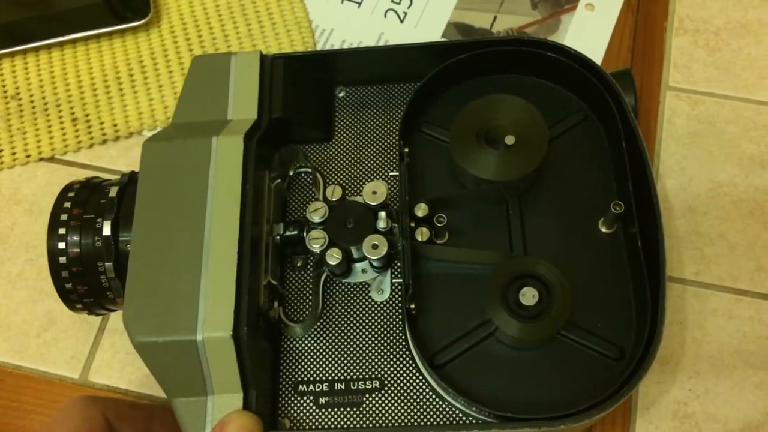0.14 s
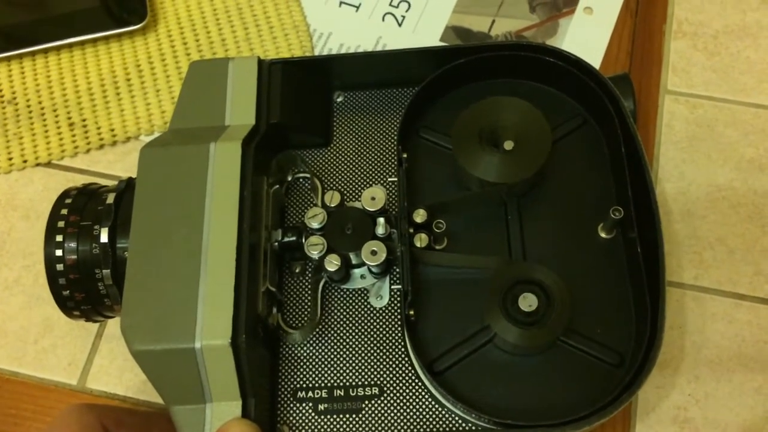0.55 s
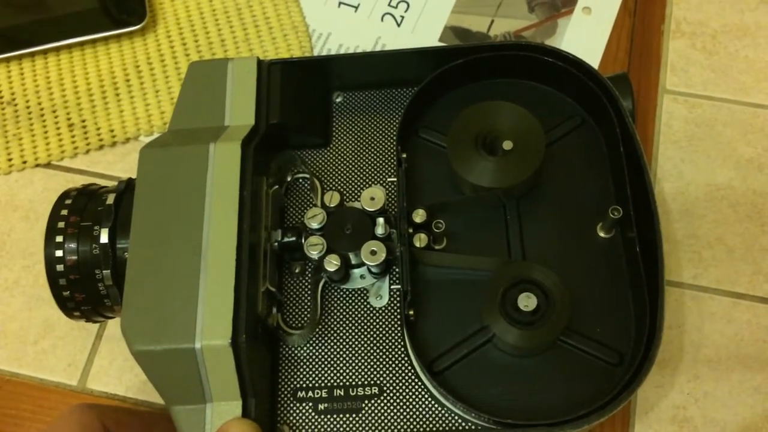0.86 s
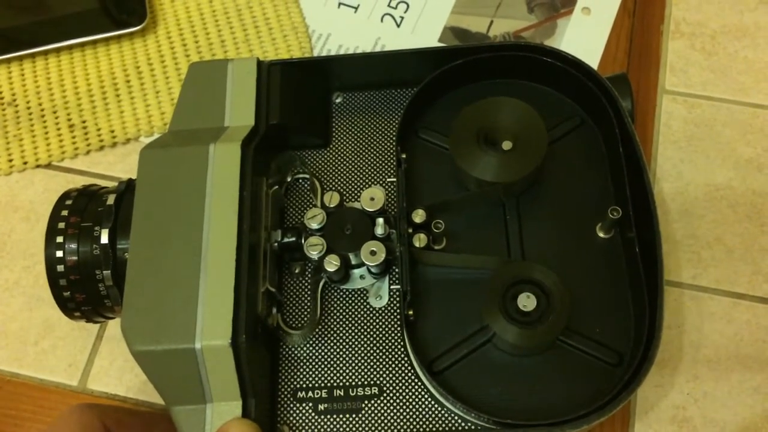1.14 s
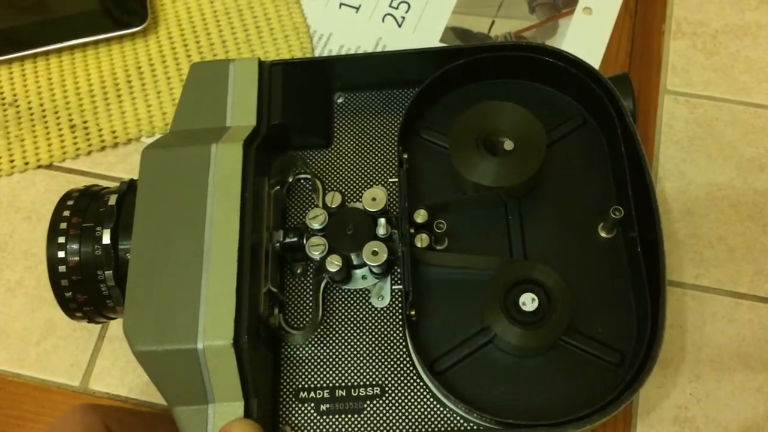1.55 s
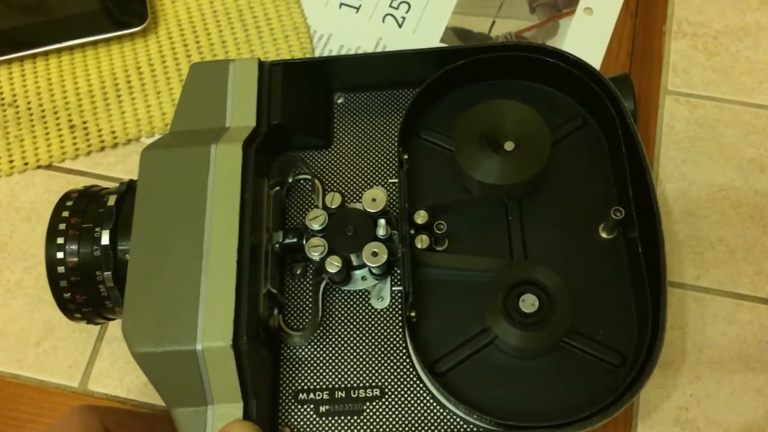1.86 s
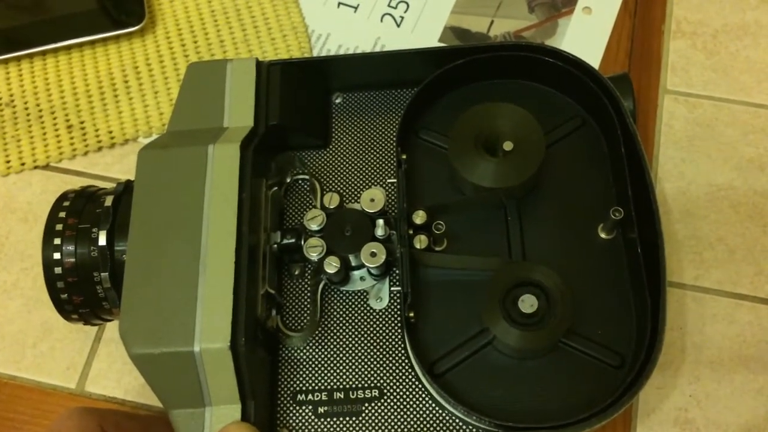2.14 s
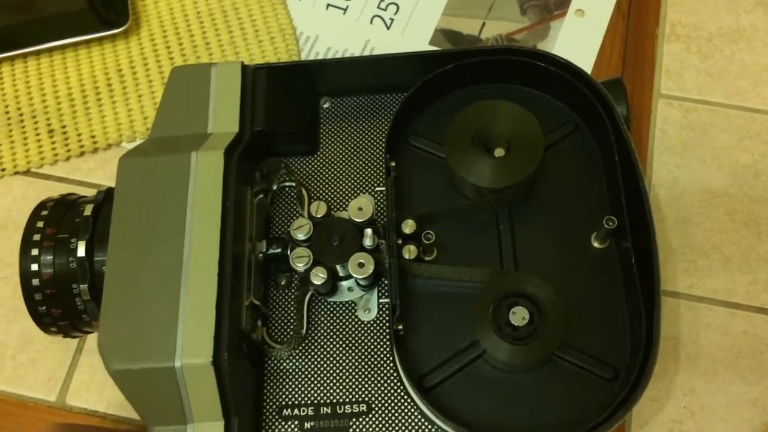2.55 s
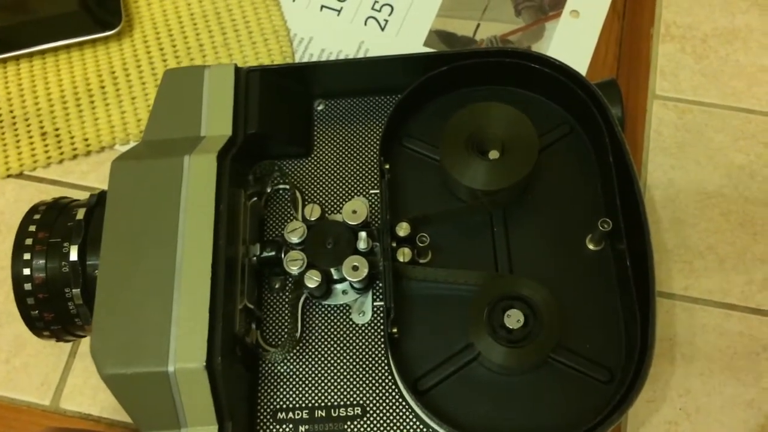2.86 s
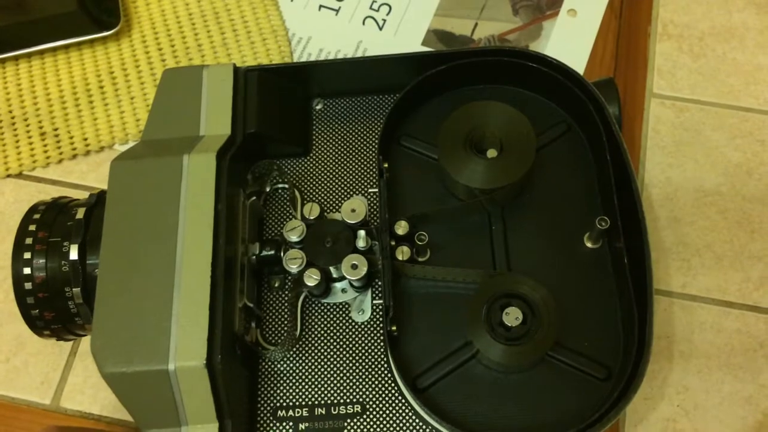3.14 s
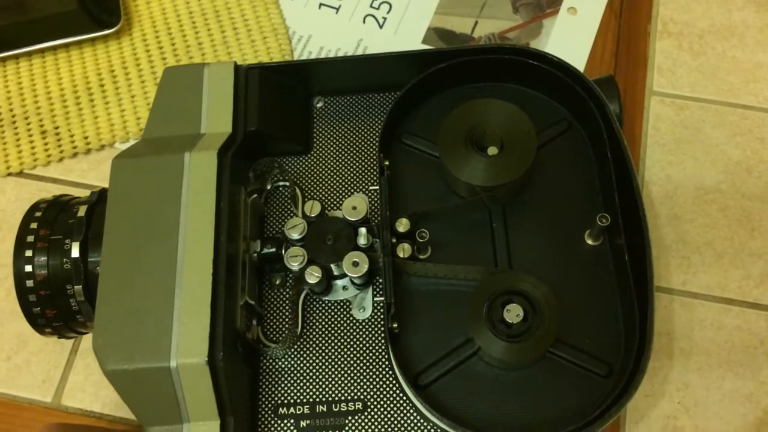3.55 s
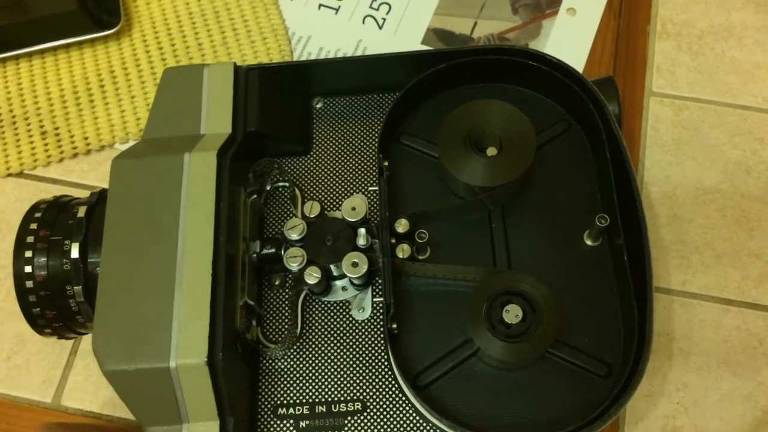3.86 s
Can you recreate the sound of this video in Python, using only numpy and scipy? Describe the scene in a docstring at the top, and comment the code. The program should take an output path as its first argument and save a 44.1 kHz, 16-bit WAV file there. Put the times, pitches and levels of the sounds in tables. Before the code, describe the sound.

A wind-up film camera whirs and clatters, then stops abruptly with a clack.

```python
"""Clockwork film camera, running and stopping

A wind-up camera runs with its side open on a tiled floor: gears rattle, the claw and shutter knock
once a frame, plates ring and the governor hums. At 2.5 s the catch drops with a clack and the
spring rings on. What remains is a quiet room and a faint electrical ticking."""
import sys
import numpy as np
from scipy import signal
from scipy.fft import rfft, irfft
from scipy.io import wavfile
from scipy.ndimage import uniform_filter1d

SR = 44100
rng = np.random.default_rng(int(sys.argv[2]) if len(sys.argv) > 2 else 0)


def inscribe(sig):
    """Save sig as 16-bit PCM at rate SR to the path in sys.argv[1].

    A 1-D sig is mono; a 2-D sig holds one channel per row.
    Samples are clipped to [-1, 1] before scaling.
    """
    pcm = np.round(np.clip(np.atleast_2d(sig).T, -1, 1) * 32767)
    wavfile.write(sys.argv[1], SR, pcm.astype(np.int16))


N = 176400

STOP_S = 2.5195  # the drive starts to run down
# Harder knocks of the claw. Each row: start in seconds, case level in dB, steel level in dB.
HARD_KNOCKS = [(0.098, -37, -62), (0.149, -33.5, -41), (0.214, -39, -40), (0.261, -35.5, -56),
               (0.283, -38.0, -40), (0.305, -39, -39), (0.342, -48, -44), (0.362, -33, -50),
               (0.463, -38, -34.5), (0.48, -42, -39), (0.498, -34, -44), (0.614, -41, -55),
               (0.654, -35.5, -49), (0.692, -37, -43), (0.73, -47.5, -39), (0.771, -31.5, -47),
               (0.786, -35, -53.5), (0.815, -36.0, -46), (0.975, -29, -39), (1.012, -41.5, -45),
               (1.051, -39, -41.0), (1.092, -37.5, -38.5), (1.291, -36, -39), (1.331, -50, -40.5),
               (1.371, -35, -38), (1.41, -33.5, -46), (1.453, -32.5, -37), (1.647, -33.5, -41),
               (1.727, -39, -39.5), (1.808, -36, -39.5), (1.89, -31, -39.5), (1.934, -35, -43),
               (2.009, -37.0, -41), (2.09, -34.5, -44), (2.139, -39, -41.5), (2.284, -44, -35),
               (2.324, -33, -47), (2.364, -33.5, -42), (2.406, -41, -38.5)]
# The catch drops in and the gear train rebounds.
# Each row: start in seconds, then case, steel and thud levels in dB.
CATCH_HITS = [(2.493, -31, -50, -44), (2.499, -32, -40, -42), (2.557, -43.5, -66, -54),
              (2.566, -62, -76, -43.5)]


def from_db(db):
    """Decibels to gain."""
    return 10 ** (np.asarray(db) / 20)


def rms_one(x):
    """Scale to unit power."""
    return x / np.sqrt(np.mean(x ** 2) + 1e-20)


def seconds():
    """Time of every sample."""
    return np.arange(N) / SR


def follow(curve):
    """Glide through rows of time in seconds and value."""
    return np.interp(seconds(), *np.transpose(curve))


def turns(curve):
    """Cycles completed under a rate curve."""
    return np.cumsum(follow(curve)) / SR


def drift(rate):
    """Random wander, gliding to a new value `rate` times a second."""
    return np.interp(seconds() * rate, np.arange(400), rng.standard_normal(400))


def body(x, spectrum, modes=()):
    """Colour a sound with a broad response lifted by resonances, at unit power gain."""
    size = 2 * N
    hz = np.maximum(np.arange(N + 1) * SR / size, 1)
    points, db = np.transpose(spectrum)
    gain = from_db(np.interp(np.log(hz), np.log(points), db))
    for centre, width, lift_db in modes:
        gain *= np.sqrt(1 + (from_db(lift_db) ** 2 - 1) / (1 + (2 * (hz - centre) / width) ** 2))
    cepstrum = irfft(np.log(rms_one(gain)))
    causal = np.r_[cepstrum[0], 2 * cepstrum[1:N]]  # minimum phase: the ring follows the hit
    return irfft(rfft(x, size) * np.exp(rfft(causal, size)))[:N]


def ringing_noise(hz, width_hz):
    """Noise through one resonance, at unit power."""
    radius, angle = np.exp(-np.pi * width_hz / SR), 2 * np.pi * hz / SR
    poles = [1, -2 * radius * np.cos(angle), radius ** 2]
    return rms_one(signal.lfilter([1, 0, -1], poles, rng.standard_normal(N)))


def impulses(starts, heights):
    """One spike at each start time."""
    return np.bincount((np.abs(starts) * SR).astype(int), heights, N)[:N]


def contact_power(starts, db, decay_s):
    """Power envelope of contacts that start at once and die away."""
    hits = impulses(starts, from_db(db) ** 2)
    return signal.lfilter([1], [1, -np.exp(-1 / (decay_s * SR))], hits + 1e-18)


def chatter(power):
    """Tiny random impacts that follow a power envelope."""
    return np.sqrt(power) * rng.standard_normal(N)


def running(run_down_s=.024):
    """Full drive until the stop, then a quick run-down."""
    return np.exp(-np.maximum(seconds() - STOP_S, 0) / run_down_s)


def room_tone():
    """Dark air with wavering low drones and faint, thin whines."""
    # Colour of the air. Each row: frequency in Hz, relative level in dB.
    air_colour = [(25, -13), (45, -11.5), (70, 0.5), (115, -1.5), (160, -3.5), (210, -11.5), (330, -6.5),
                  (500, -15.5), (900, -13.5), (1400, -22), (2200, -30.5), (4500, -36.5), (8000, -37.5),
                  (15500, -43.5)]
    # Low tones in the room. Each row: pitch in Hz, level in dB.
    drones = [(107.7, -62.5), (134.6, -68.5), (209.9, -69), (236.9, -72.5)]
    # Steady whines. Each row: centre in Hz, width in Hz, level in dB.
    whines = [(5560, 90, -93), (6470, 70, -92), (7420, 80, -87.5), (8330, 70, -94)]
    bed = from_db(-59) * body(rng.standard_normal(N), air_colour)
    for hz, db in drones:
        level = from_db(db + 3 * drift(12))
        bed += level * rms_one(np.sin(2 * np.pi * hz * seconds() + 1.65 * drift(13)))
    return bed + sum(from_db(db) * ringing_noise(hz, width) for hz, width, db in whines)


def soft_bumps():
    """A few dull, low bumps in the quiet after the stop."""
    # Each row: start in seconds, level in dB.
    bumps = [(3.162, -63), (3.229, -66), (3.495, -52.5), (3.631, -52), (3.727, -61), (3.83, -55),
             (3.948, -52)]
    # Their muffled colour. Each row: frequency in Hz, relative level in dB.
    colour = [(30, -24), (70, -5), (120, -2), (230, -6), (400, -20), (1500, -55)]
    return body(chatter(contact_power(*np.transpose(bumps), decay_s=.011)), colour)


def tiny_click():
    """One small, bright click at the very end."""
    # Each row: frequency in Hz, relative level in dB.
    colour = [(2500, -20), (4100, -2), (5500, -10), (7000, -10), (10000, -22)]
    return body(chatter(contact_power(starts=[3.976], db=[-63], decay_s=.0045)), colour)


def whistle():
    """A brief, faint, thin whistle that slides upward."""
    # Each row: time in seconds, pitch in Hz.
    slide = [(3.555, 6400), (3.6, 7000), (3.68, 7000), (3.765, 7170)]
    start, end = slide[0][0], slide[-1][0]
    swell = np.sin(np.pi * np.clip((seconds() - start) / (end - start), 0, 1))
    return from_db(-76.5) * swell * np.sin(2 * np.pi * turns(slide) + drift(90))


def electrical_ticks():
    """A faint tick pattern repeats ten times a second; each tick is three quick pulses."""
    # Each entry: start of a tick within the pattern, in seconds.
    pattern = [.0057, .0295, .0557, .0635, .0963]
    # The ticks' thin colour. Each row: frequency in Hz, relative level in dB.
    colour = [(1200, -30), (2100, 3.5), (2900, -7), (3500, -9.5), (5000, -11.5), (9000, -22), (15000, -33)]
    # Their resonances. Each row: centre in Hz, width in Hz, lift in dB.
    modes = [(2300, 500, 1.5), (3400, 350, 6)]
    period_s, pulse_hz = .1, 1136
    ticks = (np.arange(0, N / SR, period_s)[:, None] + pattern).ravel()
    offsets = (np.arange(3) + rng.uniform(-.2, .2, (len(ticks), 3))) / pulse_hz
    starts = (ticks[:, None] + offsets).ravel()
    pulses = impulses(starts, 1 + .22 * rng.standard_normal(len(starts)))
    return from_db(-51) * body(pulses, colour, modes)


def reflections(x, t60_s=.36, level_db=-11.5):
    """A short, dense tail from the floor and walls."""
    t = seconds()
    tail = rng.standard_normal(N) * np.exp(-np.log(1000) * t / t60_s) * (t > .004)
    return from_db(level_db) * signal.fftconvolve(x, tail / np.sqrt(np.sum(tail ** 2)))[:N]


def governor():
    """The spinning weights hum at their turning rate and its multiples, dying out after the stop."""
    # Two blades pass per turn. Each row: time in seconds, blade rate in Hz.
    blade_rate = [(0.0, 142.2), (0.23, 139.7), (0.38, 139.6), (0.71, 140.3), (0.83, 136.4), (1.05, 137.6),
                  (1.2, 141.2), (1.45, 136.4), (2.05, 136.5), (2.26, 141.5), (2.37, 137.7), (2.5, 136.8)]
    # The hum. Each row: multiple of the turning rate, level in dB.
    harmonics = [(1, -56.5), (2, -54.5), (3, -64), (7, -67)]
    # Its shifting balance. Each row: time in seconds, trims in dB for odd and for even harmonics.
    balance = [(0, 1, 1), (.3, 3.5, -3.5), (.5, 0, 4.5), (.75, 5, -5), (.85, -2.5, 3), (1.13, 4.5, -2),
               (1.22, 0, -1.5), (1.65, -6.5, 1.5), (1.85, -0.5, 2), (2.16, 1, 3), (2.29, -2, -4),
               (2.45, -1, 3)]
    times, odd_db, even_db = np.transpose(balance)
    angle = np.pi * turns(blade_rate)
    hum = np.zeros(N)
    for multiple, db in harmonics:
        trim_db = np.interp(seconds(), times, odd_db if multiple % 2 else even_db)
        level = from_db(db + trim_db + 1.3 * drift(10.25))
        phase = multiple * angle + 2 * np.pi * rng.random() + .25 * drift(41)
        hum += level * rms_one(np.sin(phase))
    return hum * running(run_down_s=.062)


def gear_whirr(flutter_rad=1.3):
    """The meshing gears sing a fluttering note that sags just before the stop."""
    # Each row: time in seconds, pitch in Hz, level in dB.
    note = [(0, 392.4, -65), (.2, 393.5, -53.5), (.55, 389, -72), (.8, 395.3, -56), (1.2, 375.1, -61),
            (1.38, 388, -50.5), (1.6, 378, -66), (1.8, 395.4, -50), (2.05, 386.5, -65), (2.3, 390, -50.5),
            (2.42, 368, -52.5), (2.5, 367.7, -49.5)]
    times, hz, db = np.transpose(note)
    level = from_db(follow(np.c_[times, db])) * running()
    phase = 2 * np.pi * turns(np.c_[times, hz]) + flutter_rad * drift(60)
    return level * np.sqrt(2) * np.sin(phase)


def spring():
    """The catch sets the spring's long, thin modes ringing."""
    # Each row: pitch in Hz, level in dB, seconds to fall by 60 dB.
    modes = [(1766, -60.5, 1.1), (2304, -70, .6)]
    age = np.maximum(seconds() - STOP_S, 0)
    return sum(from_db(db - 60 * age / t60) * np.sqrt(2) * np.sin(2 * np.pi * hz * age)
               for hz, db, t60 in modes)


def plate_ring(power, hz, width_hz):
    """A rattled plate's ring builds with each contact and dies away; unit power while running."""
    stored = signal.lfilter([1], [1, -np.exp(-2 * np.pi * width_hz / SR)], power)
    ring = ringing_noise(hz, width_hz)
    ring /= np.sqrt(uniform_filter1d(ring ** 2, int(.012 * SR)) + 1e-9)  # level out over 12 ms
    return np.sqrt(stored / stored[:N // 2].mean()) * ring


def plates(power):
    """Plates ring in fits as the load shifts; the cover is the loudest."""
    # The quieter plates. Each row: centre in Hz, width in Hz, level in dB.
    modes = [(1206, 65, -52.5), (1650, 71, -48.5), (1777, 47, -51.5)]
    # The cover's ring. Each row: time in seconds, level in dB.
    cover_level = [(0, -45), (.15, -48), (.23, -42), (.37, -40), (.41, -57), (.47, -46), (.62, -48),
                   (.66, -40.5), (.8, -42), (1.0, -64), (1.05, -44), (1.29, -44), (1.34, -53), (1.45, -49),
                   (1.52, -54), (1.7, -40), (1.82, -51), (1.92, -44), (2.08, -42.5), (2.18, -41.5),
                   (2.5, -46)]
    quiet = sum(from_db(db - 3.5 * np.tanh(drift(13))) * plate_ring(power, hz, width)
                for hz, width, db in modes)
    cover_db = follow(cover_level) + 2 * (np.tanh(drift(40.05)) - .5)
    return quiet + from_db(cover_db) * plate_ring(power, hz=2175, width_hz=105)


def gear_rattle(teeth_per_s=420, spread_db=2):
    """Power envelope of loose teeth slapping one another; mean 1 while running."""
    late, force = rng.standard_normal((3000, 2)).T
    starts = (np.arange(len(late)) + .34 * late) / teeth_per_s
    power = contact_power(starts, spread_db * np.minimum(force, 2), decay_s=.0026)
    return power / power[:N // 2].mean() * running() ** 2


def claw_contacts(jitter_s=.0022, spread_db=1.2):
    """Claw and shutter hits of every frame, uneven in time and force; rows as in HARD_KNOCKS."""
    # Film speed. Each row: time in seconds, frames per second.
    frame_rate = [(0, 25.15), (.5, 25.15), (.62, 26.1), (.75, 25.15)]
    # One frame's contacts. Each row: place in the cycle from 0 to 1, case and steel levels in dB.
    cycle = [(0.032, -41, -45.5), (0.349, -56, -47), (0.452, -39.5, -45), (0.538, -49, -50),
             (0.68, -39, -67), (0.808, -60, -66)]
    frames = turns(frame_rate) - .11  # the first cycle begins a moment in
    hits = []
    for place, case_db, steel_db in cycle:
        starts = np.interp(np.arange(int(frames[-1])) + place, frames, seconds())
        late, force, on_case, on_steel = rng.uniform(-1, 1, (len(starts), 4)).T
        hits.append(np.c_[starts + jitter_s * late,
                          case_db + spread_db * np.minimum(force + on_case, 1),
                          steel_db + spread_db * np.minimum(force + on_steel, 1)])
    hits = np.vstack(hits)
    return hits[hits[:, 0] < STOP_S]


def steel_parts(starts, db, teeth):
    """Contacts and teeth buzz in the steel, and the claw tip adds its own bright click."""
    # The steel's colour. Each row: frequency in Hz, relative level in dB.
    steel_colour = [(900, -16.5), (2500, -11.5), (3300, 3), (4000, -1.5), (5000, 1), (6300, -1.5),
                    (7400, -9), (11500, -9), (12700, -10.5), (15500, -14)]
    # The tip's colour. Each row: frequency in Hz, relative level in dB.
    tip_colour = [(2000, -39), (5000, -11), (7800, 12.5), (11500, 10.5), (12700, 8), (15500, -33)]
    # Resonances of both. Each row: centre in Hz, width in Hz, lift in dB.
    modes = [(3240, 82, 3.9), (5430, 27, 1.4), (6793, 154, 9.4), (7810, 520, 5.9), (9400, 240, 6.5),
             (11200, 640, 4.2)]
    # The treble eases off. Each row: time in seconds, trim in dB.
    trim = [(0, 1.2), (.45, 0.5), (1.0, -0.2), (1.6, -0.5), (2.1, -1), (2.5, -1)]
    tooth_power = teeth * from_db(-46) ** 2 * running() ** .67  # slowing teeth lose treble first
    buzz = chatter(contact_power(starts, db, decay_s=.0017) + tooth_power)
    buzz *= from_db(follow(trim) + drift(26.89))
    buzz *= rms_one(from_db(rng.standard_normal(N)))  # 1 dB of grain
    tip = chatter(contact_power(starts, db - 3, decay_s=.00091))
    tip *= from_db(-2.5 * np.tanh(drift(24.5)))
    return body(buzz, steel_colour, modes) + body(tip, tip_colour, modes)


def housing_thud(teeth):
    """The whole housing rumbles with the gears and thuds as the catch drops."""
    # Each row: frequency in Hz, relative level in dB.
    colour = [(25, -54), (55, 6.5), (100, 1.5), (170, -5), (260, 2.5), (400, 2.5), (480, -6.5), (900, -11),
              (3000, -22), (12000, -52)]
    # The housing's resonances. Each row: centre in Hz, width in Hz, lift in dB.
    modes = [(394, 41, 6.6), (484, 13, 8.2), (614, 23, 13.6)]
    starts, _, _, db = np.transpose(CATCH_HITS)
    power = contact_power(starts, db, decay_s=.0047) + teeth * from_db(-50.5) ** 2
    return body(chatter(power), colour, modes)


def case_clatter(power, strike_db=10):
    """The case chatters; each hard knock and catch hit opens with one clean impact."""
    # The case's midrange voice. Each row: frequency in Hz, relative level in dB.
    colour = [(200, -45), (500, -14), (750, -8.5), (1020, 1), (1400, 0.5), (1900, -2), (2300, -5.5),
              (2700, -10), (4000, -16), (9000, -40.5)]
    # Its resonances. Each row: centre in Hz, width in Hz, lift in dB.
    modes = [(826, 52, 4), (1107, 140, 2.5), (1300, 160, 1.5), (1757, 165, 7.5), (1970, 37, 4.5),
             (2160, 43, 14.5), (2434, 66, 5), (2694, 59, 11.5)]
    starts, db = np.transpose([hit[:2] for hit in HARD_KNOCKS + CATCH_HITS])
    strikes = impulses(starts, from_db(db + strike_db))
    return body(chatter(power) + strikes, colour, modes)


def mechanism():
    """Gears, claw and catch shake the case, steel parts, housing, plates and spring."""
    teeth = gear_rattle()
    hits = np.vstack([claw_contacts(), HARD_KNOCKS, np.array(CATCH_HITS)[:, :3]])
    starts, case_db, steel_db = hits.T
    case_power = contact_power(starts, case_db, decay_s=.0032) + teeth * from_db(-42) ** 2
    return (case_clatter(case_power) + steel_parts(starts, steel_db, teeth) + housing_thud(teeth)
            + plates(case_power) + spring())


def scene():
    """The camera in its room, in mono."""
    clatter = mechanism()
    camera = clatter + reflections(clatter) + governor() + gear_whirr()
    background = room_tone() + soft_bumps() + tiny_click() + whistle() + electrical_ticks()
    return (camera + background)[None]


def record(dry, cutoff_hz=15600):
    """A steep low-pass takes off the very top."""
    return signal.sosfilt(signal.ellip(12, .1, 80, cutoff_hz, fs=SR, output="sos"), dry)


dry = scene()
out = record(dry)
inscribe(out)
```